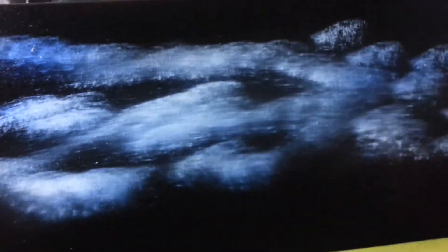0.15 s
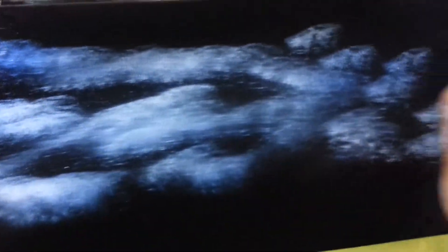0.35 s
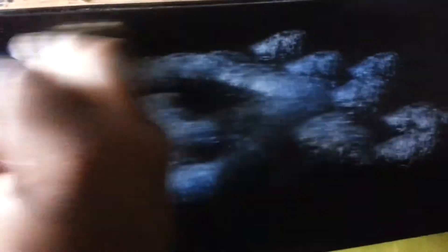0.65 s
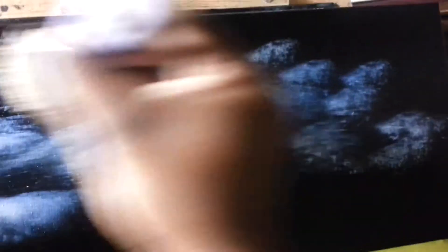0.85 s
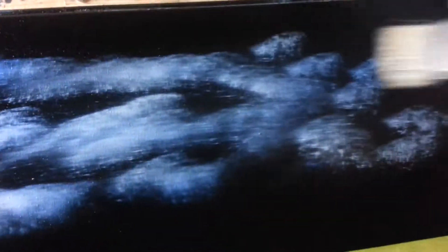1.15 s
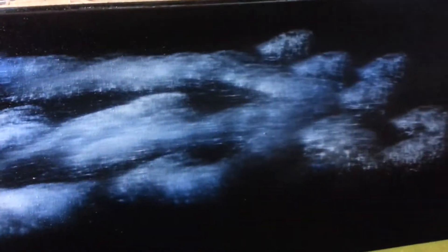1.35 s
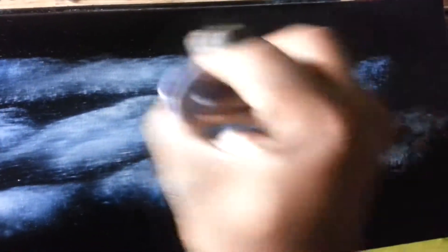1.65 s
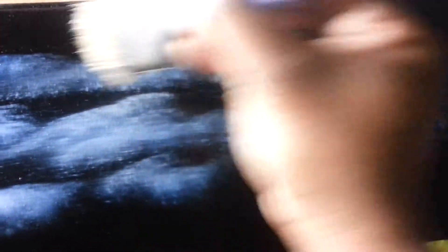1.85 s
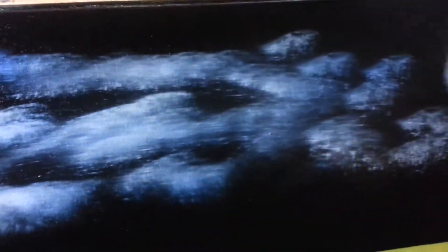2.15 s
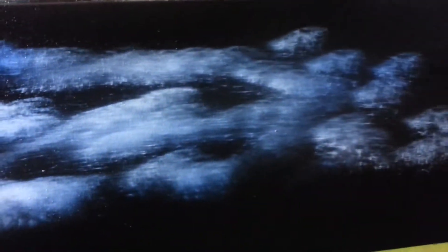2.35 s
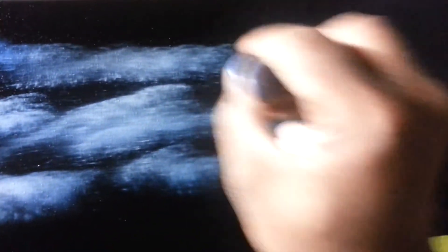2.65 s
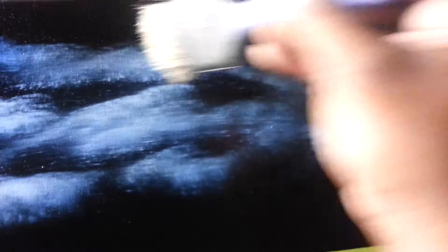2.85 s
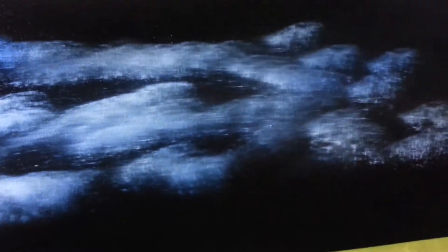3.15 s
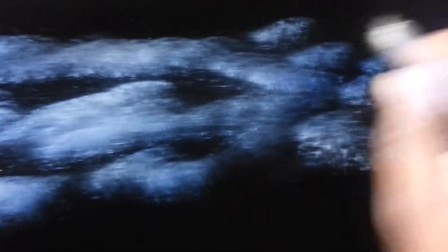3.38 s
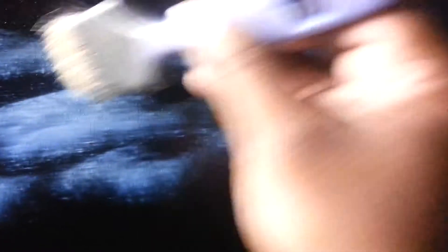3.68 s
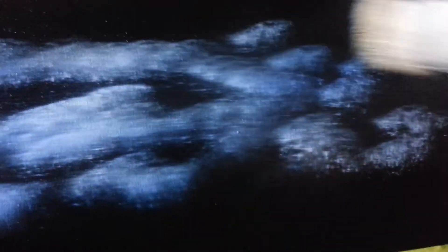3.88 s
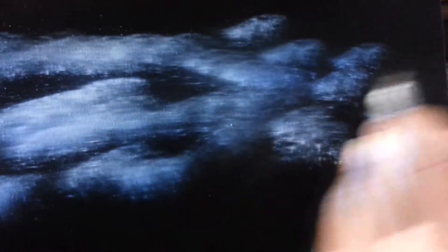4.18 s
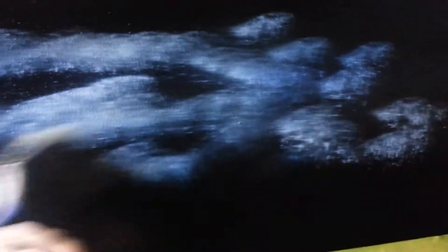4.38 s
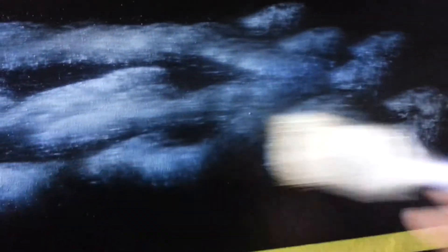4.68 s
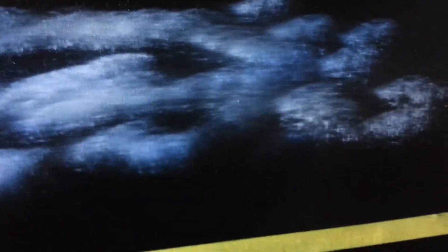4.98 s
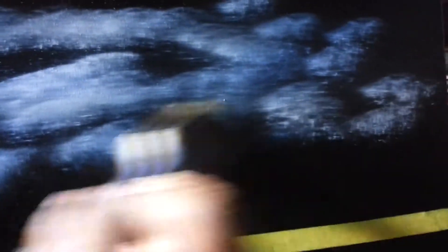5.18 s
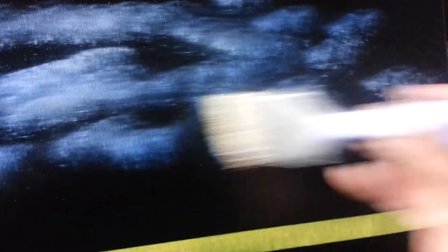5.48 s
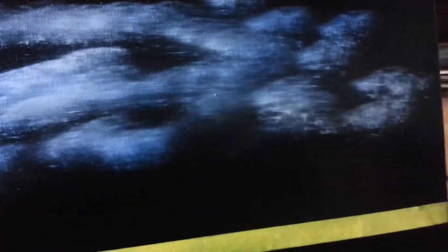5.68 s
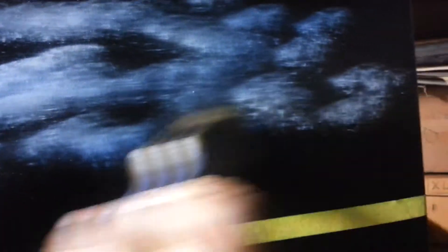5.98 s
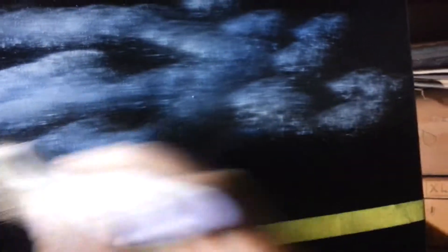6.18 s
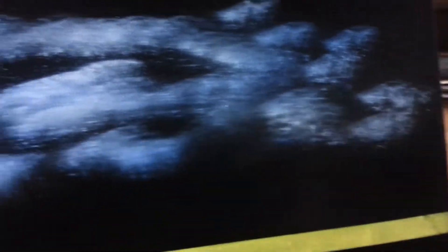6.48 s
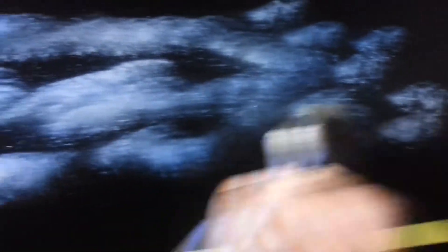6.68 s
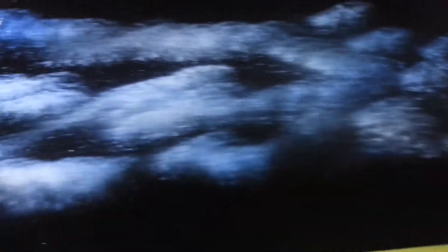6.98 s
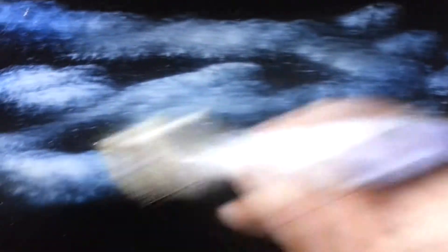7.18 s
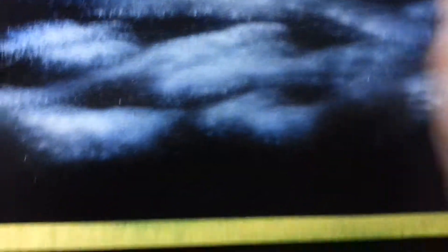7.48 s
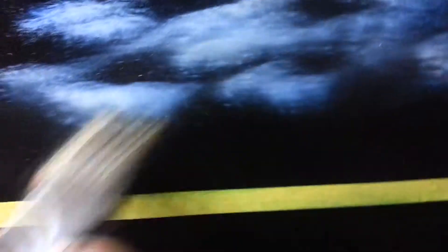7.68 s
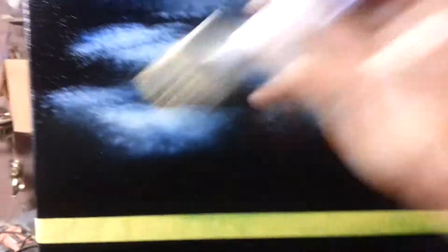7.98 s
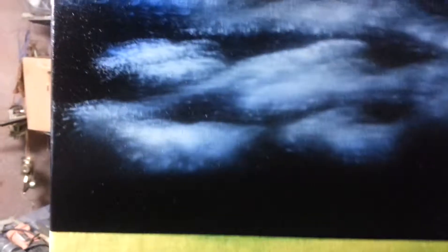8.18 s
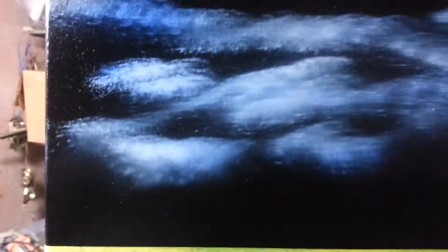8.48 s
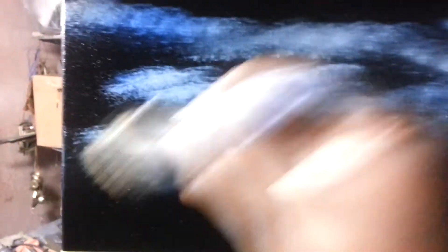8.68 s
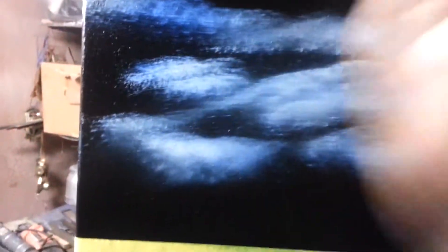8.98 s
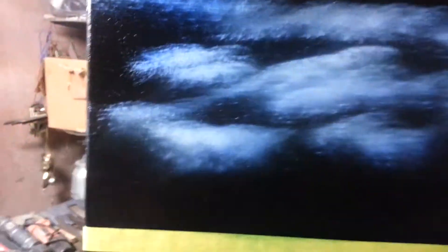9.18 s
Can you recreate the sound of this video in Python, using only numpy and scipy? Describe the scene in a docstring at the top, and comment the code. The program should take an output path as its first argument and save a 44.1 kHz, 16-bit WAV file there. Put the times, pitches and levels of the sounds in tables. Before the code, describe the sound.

A wide dry paintbrush sweeps back and forth across a stretched canvas, close to the microphone and a little to the right. Each short stroke is a scratchy, bristly hiss with a faint zip from the weave, about two a second with brief gaps. Now and then the bristles give a tiny squeak or a bump makes the canvas drum softly. A small room hums faintly in the pauses.

```python
"""A wide dry paintbrush sweeps back and forth over a stretched canvas, close by and to the right.
From the first stroke, thousands of bristles slip off the threads in a dry hiss, and the regular weave
adds a faint zip whose pitch follows the speed of the hand. Bristles squeak briefly as they flick free
at a lift or catch on the weave, and a small room hums in the pauses. From the second stroke on, an
occasional bump sets the canvas drumming softly in its membrane modes, while the strokes go on."""
import sys
import numpy as np
from scipy import signal
from scipy.fft import rfft, irfft, next_fast_len
from scipy.io import wavfile
from scipy.ndimage import uniform_filter1d

SR = 44100
rng = np.random.default_rng(int(sys.argv[2]) if len(sys.argv) > 2 else 0)


def wrap_up_sound(samples):
    """Save the sound to the file named by the first command line argument, as 16-bit audio."""
    columns = np.atleast_2d(samples).T
    # keep every value between -1 and 1, then stretch to whole-number steps
    tamed = np.clip(columns, -1, 1)
    steps = np.round(tamed * 32767).astype(np.int16)
    wavfile.write(sys.argv[1], SR, steps)


N = 411894
TIME = np.arange(N) / SR

# Brush strokes. Each row: touch, lift, attack and settling time in seconds; settled pressure level, its
# offset on landing, its change by the lift and the cloth's further change as the brush rolls, in dB;
# relative levels of rasp, tip hiss and zip in dB; moments of flattest bristles and fastest hand in
# seconds; thread-crossing rates at the touch, at the fastest moment and at the lift in Hz.
STROKES = [(-0.027, 0.238, 0.02, 0.04, -40.0, -2.0, 1.5, -6.0, -4.0, -3.0, -5.5, 0.12, 0.13, 1250, 1970, 2030),
           (0.453, 0.785, 0.065, 0.23, -39.0, -3.5, -7.0, 1.0, -3.5, -2.5, -9.0, 0.6, 0.78, 870, 1800, 1800),
           (1.044, 1.331, 0.017, 0.09, -40.0, -6.0, -2.0, -4.5, -2.0, -1.5, -3.0, 1.25, 1.28, 1210, 1570, 1770),
           (1.531, 1.845, 0.08, 0.19, -40.5, 3.0, 2.0, -2.5, -2.0, -2.0, -8.0, 1.7, 1.84, 590, 1820, 1820),
           (2.095, 2.307, 0.027, 0.09, -40.5, -4.0, -2.0, -4.0, -2.0, -1.0, -8.0, 2.22, 2.12, 1450, 1540, 1030),
           (2.659, 2.863, 0.024, 0.17, -40.0, -0.5, 1.0, -2.0, -1.5, -0.0, -15.0, 2.77, 2.83, 940, 1270, 1540),
           (3.043, 3.26, 0.022, 0.06, -41.0, 6.0, -1.0, -5.5, -0.0, 1.0, -8.5, 3.18, 3.25, 760, 1680, 1680),
           (3.374, 3.708, 0.049, 0.2, -39.5, 2.5, 3.5, -1.0, -2.0, -1.5, -9.0, 3.56, 3.68, 420, 1510, 1510),
           (3.9, 4.051, 0.037, 0.05, -39.5, -4.0, 3.0, -3.0, -1.0, -0.5, -3.0, 3.98, 4.03, 1490, 2000, 1820),
           (4.256, 4.558, 0.049, 0.18, -40.0, -2.0, -2.0, 2.0, -1.0, 2.5, -4.5, 4.4, 4.41, 960, 1930, 1530),
           (4.66, 4.926, 0.051, 0.1, -39.5, 1.0, 2.0, -4.5, -1.0, -0.5, -4.0, 4.81, 4.87, 890, 2080, 2020),
           (5.113, 5.395, 0.111, 0.21, -37.0, -5.0, -5.0, 1.5, 0.0, 3.0, -5.0, 5.28, 5.25, 1170, 1800, 1580),
           (5.542, 5.745, 0.034, 0.05, -38.5, 4.0, -0.5, -4.0, 0.0, 0.5, -5.5, 5.64, 5.69, 980, 2040, 1750),
           (5.956, 6.224, 0.092, 0.17, -39.5, 1.0, -0.0, 4.0, 0.5, 3.0, -4.0, 6.09, 6.12, 1470, 1830, 1310),
           (6.398, 6.545, 0.027, 0.08, -36.5, -0.0, 2.5, -2.0, -0.5, -1.5, -7.0, 6.46, 6.52, 1430, 2180, 1850),
           (6.678, 7.132, 0.044, 0.17, -40.0, 1.0, -1.0, 8.0, 0.0, 2.0, -4.5, 6.87, 6.9, 780, 2020, 700),
           (7.238, 7.402, 0.046, 0.1, -38.0, -1.0, 1.0, 0.0, -2.0, 1.0, -10.0, 7.38, 7.4, 780, 2300, 2300),
           (7.611, 7.89, 0.041, 0.15, -38.5, -2.0, 1.0, -4.5, -0.5, 2.0, -10.0, 7.76, 7.78, 760, 1990, 1710),
           (7.97, 8.223, 0.099, 0.2, -36.0, -5.5, -1.5, -6.5, -1.5, -0.0, -6.0, 8.17, 8.22, 740, 2180, 2180),
           (8.365, 8.605, 0.023, 0.08, -40.0, -12.0, 0.0, -1.5, -1.0, 0.5, -6.0, 8.45, 8.53, 1650, 2000, 1750),
           (8.783, 8.937, 0.034, 0.11, -37.5, -7.5, 1.5, -6.0, 0.0, 3.5, -4.5, 8.88, 8.93, 1030, 2210, 2210),
           (9.093, 9.274, 0.015, 0.08, -42.0, -15.5, 4.0, -3.0, -0.0, 1.0, -4.5, 9.19, 9.19, 1630, 1920, 1710)]
# Response of cloth, shafts and tips to the hand. Each row: exponent of speed in the amplitude, extra
# level on landing in dB, lead of the release before the lift in seconds, release time in seconds.
FRICTION_LAWS = [(1.7, 0.1, .0042, .015), (1.19, -3.2, .0002, .0125), (1.21, -5.8, .0002, .012)]
# Spectra of the rubbed cloth, the rasping shafts, the hissing tips and their topmost sparkle.
# Each row: frequency in Hz, relative level in dB.
CLOTH_SPECTRUM = [(40, -40), (120, -27), (300, -13.5), (550, -11.5), (800, -4), (1100, -4.5), (1500, 0.5),
                  (2200, 0), (2600, 0.5), (3200, -4.5), (5000, -26), (14000, -50)]
SHAFT_SPECTRUM = [(1500, -29), (2200, -16), (2700, -4), (3200, 0), (4000, 0), (4900, -1), (5800, -10),
                  (7500, -11), (14000, -26)]
TIP_SPECTRUM = [(3000, -32), (5000, -2), (6300, -1.5), (7500, -1), (8800, 2.5), (10500, 0.5), (12500, -1.5),
                (14500, -13.5)]
SPARKLE_SPECTRUM = [(7000, -30), (10500, -6), (13500, 6)]
# Resonances of the bent shafts. Each row: frequency in Hz, width in Hz, relative level in dB.
SHAFT_MODES = [(2587, 136, -5.5), (3904, 430, -4.5)]
# Spectrum of the room noise and the filter for its rumble. Each row: frequency in Hz, gain in dB.
ROOM_SPECTRUM = [(15, -42), (25, -21.5), (97, -9), (134, -3), (205, -4), (388, -7.5), (455, -12),
                 (534, -12), (862, -19), (1100, -20), (1430, -19), (1970, -23), (2710, -22.8), (5710, -28),
                 (14500, -26.5)]
RUMBLE_BAND = [(150, 4), (280, -6), (600, -40)]
# Likeness of the room noise at the two sides. Each row: frequency in Hz, correlation.
ROOM_COHERENCE = [(30, 0.37), (80, 0.25), (250, 0.41), (700, 0.15), (2000, 0.068), (8000, 0.024)]
# Two hums that trade places. Each row: time in seconds, relative levels of the lower and upper in dB.
HUM_LEVELS = [(.9, -64, -64), (1.4, -60.5, -59), (2.0, -65, -55), (2.5, -71, -54), (2.95, -56, -60.5),
              (4.2, -58.5, -64), (6.65, -58.5, -65), (7.5, -62, -65), (8.0, -66, -56), (9.3, -68, -58.5)]
# Brief bristle squeaks: catching on the weave during a stroke, or flicking free at the lift.
# Each row: time in seconds, pitch in Hz, relative level in dB.
SQUEAKS = [(.238, 3897, -38.5), (.775, 2080, -43), (1.277, 1610, -43), (2.225, 1380, -41.5),
           (2.74, 2500, -44), (2.852, 1501, -42), (2.855, 2584, -42.5), (4.04, 4041, -41),
           (4.408, 1950, -41), (4.93, 4000, -42), (6.535, 3806, -44), (7.39, 1291, -42), (8.218, 3898, -43),
           (8.442, 1800, -42), (8.93, 4300, -42), (9.27, 4100, -39)]
# Bumps on the canvas. Each row: time in seconds, relative level in dB, offset of the scuff in dB.
BUMPS = [(.621, -40.5, -17), (1.051, -43, -3), (1.162, -39, -13), (1.204, -33.5, -11), (1.218, -41, -12),
         (1.377, -41, -4), (4.095, -45, 6.5), (4.232, -61, 10), (5.666, -28.5, -16), (5.681, -30.5, -6),
         (5.692, -38, -3), (5.71, -32.5, -15), (5.893, -51, 4), (6.519, -44, -10), (7.024, -40, 3),
         (7.17, -38, 2), (7.185, -34, -9.5), (8.649, -45, -7)]
# Membrane modes. Each row: frequency in Hz, relative level in dB, time to fall by 60 dB in seconds.
CANVAS_MODES = [(133, -17.5, 0.24), (176, -17.5, 0.32), (237.6, -9.5, 0.31), (308, -5, 0.11),
                (348, -5.5, 0.098), (420, -2, .05), (520, 0, 0.034), (720, -12, 0.032), (1160, -17, .03)]
# Spectrum of the bristles' scuff at a bump. Each row: frequency in Hz, relative level in dB.
SCUFF_SPECTRUM = [(40, -25), (200, -7.5), (1100, -1.5), (3000, -4.5), (12000, -19)]
# Likeness of the brush at the microphone's two ports. Each row: frequency in Hz, correlation.
BRUSH_COHERENCE = [(200, 0.42), (500, 0.52), (1000, 0.72), (2000, 0.2), (4000, 0.077), (14000, .03)]
# Shadow on the left port, which faces away, and tone of the walls. Each row: frequency in Hz, gain in dB.
LEFT_SHADOW = [(200, 1), (500, -3.5), (1000, -6), (2000, -6.5), (4000, -9.5), (8000, -12.5), (14000, -13)]
WALL_RESPONSE = [(300, 12.5), (1500, 0), (4000, -4), (12000, -7)]


def from_db(db):
    """Amplitude grows tenfold for every 20 dB."""
    return 10 ** (np.asarray(db) / 20)


def unit_rms(x):
    """Division by the root mean square gives unit power."""
    return x / np.sqrt(np.mean(x ** 2) + 1e-20)


def ramp(elapsed_s, length_s):
    """A linear rise from 0 to 1 gives the share of a span gone by."""
    return np.clip(elapsed_s / np.maximum(length_s, 1e-3), 0, 1)


def colour(x, spectrum):
    """Filtering multiplies the spectrum by a gain curve, here in dB over log frequency."""
    size = next_fast_len(N, True)
    hz = np.maximum(np.fft.rfftfreq(size, 1 / SR), 1)
    knot_hz, knot_db = np.transpose(spectrum)
    gain = from_db(np.interp(np.log(hz), np.log(knot_hz), knot_db))
    return irfft(rfft(x, size) * gain, size)[..., :N]


def drift(rate_hz):
    """Low-passed noise wanders smoothly, with unit spread, at about the given rate."""
    step, warm_up = 20, 4000
    pole = np.exp(-2 * np.pi * step * rate_hz / SR)
    noise = rng.standard_normal(N // step + warm_up + 2)
    slow = signal.lfilter([1], [1, -2 * pole, pole * pole], noise)[warm_up:]
    return np.interp(np.arange(N) / step, np.arange(len(slow)), unit_rms(slow))


def narrow_noise(hz, width_hz):
    """Many near-equal vibrations beat about a moving pitch, differently at each port."""
    phase = 2 * np.pi * np.cumsum(hz) / SR
    cos, sin = np.cos(phase), np.sin(phase)
    return np.array([drift(width_hz) * cos + drift(width_hz) * sin for port in range(2)]) / np.sqrt(2)


def hand_strokes(zip_catch_s=.08, zip_landing_db=-9, zip_fade_db_per_s=55, zip_slow_db=2):
    """Friction noise grows with pressure and speed; the thread-crossing rate follows speed alone."""
    envelopes = np.zeros((3, N))   # cloth, shafts, tips
    weave_hz = np.full(N, np.mean(np.array(STROKES)[:, -3:]))
    zip_db = np.zeros(N)
    for (touch, lift, attack, settle, level_db, landing_db, ease_db, roll_db,
         rasp_db, tips_db, stroke_zip_db, flattest, fastest, touch_hz, top_hz, lift_hz) in STROKES:
        span = slice(*np.searchsorted(TIME, [touch, lift + .1]))   # still by 0.1 s after the lift
        t = TIME[span]
        # the hand speeds up to its fastest moment, then slows until the lift
        early = ramp(fastest - t, fastest - touch) ** 1.3
        late = ramp(t - fastest, lift - fastest) ** 2.05
        weave_hz[span] = top_hz + (touch_hz - top_hz) * early + (lift_hz - top_hz) * late
        speed = weave_hz[span] / top_hz
        # the pressure settles after landing, then eases off or digs in towards the end
        landing = (1 - ramp(t - touch, settle)) ** .51
        leaving = ramp(t - touch, lift - touch) ** 6.5
        pressure = ramp(t - touch, attack) * from_db(level_db + landing_db * landing + ease_db * leaving)
        for envelope, part_db, law in zip(envelopes, (roll_db * leaving, rasp_db, tips_db), FRICTION_LAWS):
            power, soft_db, lead_s, release_s = law
            release = np.exp(-np.maximum(t - lift + lead_s, 0) / release_s)
            envelope[span] += pressure * speed ** power * from_db(part_db + soft_db * landing) * release
        # the zip catches after the touch and is clearest with flat bristles and a slow hand
        catch_db = zip_landing_db * (1 - ramp(t - touch, zip_catch_s))
        fade_db = zip_fade_db_per_s * np.abs(t - flattest)
        zip_db[span] = stroke_zip_db + catch_db - fade_db + zip_slow_db * (1 - speed)
    return envelopes, weave_hz, zip_db


def bristle_slips(spectrum, per_s, spread_db):
    """Bristles slipping off threads at random make shot noise; each port hears its own clicks."""
    slips = rng.random((2, N)) < per_s / SR
    size, sign = rng.random((slips.sum(), 2)).T
    clicks = np.zeros((2, N))
    clicks[slips] = from_db(spread_db * np.minimum(-np.log(1 - size), 4)) * np.sign(sign - .5)
    return unit_rms(colour(clicks, spectrum))


def cloth_rub(speed):
    """Stick-slip friction drives the cloth, with more slips a second as the hand speeds up."""
    flutter = from_db(-.1 * drift(120))
    return flutter * bristle_slips(CLOTH_SPECTRUM, per_s=14000 * speed, spread_db=3)


def shaft_rasp(speed, bend_octaves=.17):
    """The shafts rasp and resonate, at pitches that slide as they bend and straighten."""
    flutter = from_db(-.1 * drift(120))
    rasp = flutter * bristle_slips(SHAFT_SPECTRUM, per_s=14000 * speed, spread_db=2.5)
    bend = 2 ** (bend_octaves * np.clip(drift(4), -2, 2))
    ringing = sum(from_db(db) * narrow_noise(hz * bend, width_hz) for hz, width_hz, db in SHAFT_MODES)
    return unit_rms(rasp + ringing)


def tip_hiss(speed, sparkle_db=-8):
    """The tips make high shot noise; faster tips snap harder and add to the very top."""
    hiss = bristle_slips(TIP_SPECTRUM, per_s=22000 * speed, spread_db=2)
    sparkle = unit_rms(colour(rng.standard_normal((2, N)), SPARKLE_SPECTRUM))
    return hiss + from_db(sparkle_db) * speed ** 1.5 * sparkle


def weave_zip(weave_hz, zip_db, boost_db=10.5, octave_db=-11, skid_db=-6, zip_width_hz=48,
              skid_width_hz=260):
    """Periodic forcing: bristles that keep pace sing the weave rate in fits; bent ones skid about it."""
    tone = narrow_noise(weave_hz, zip_width_hz) * from_db(2.3 * drift(38))
    tone += from_db(octave_db) * narrow_noise(2 * weave_hz, skid_width_hz)
    skid = from_db(skid_db) * narrow_noise(weave_hz, skid_width_hz)
    return from_db(boost_db + zip_db) * tone + skid


def brush(envelopes, weave_hz, zip_db, cloth_db=2.9, shaft_db=4.6, tip_db=4.5):
    """The friction sounds superpose, and flutter together as tufts catch and let go."""
    cloth_envelope, shaft_envelope, tip_envelope = envelopes
    speed = weave_hz / np.mean(weave_hz)
    flutter = from_db(drift(34))
    cloth = cloth_envelope * (from_db(cloth_db) * cloth_rub(speed) + weave_zip(weave_hz, zip_db))
    shafts = shaft_envelope * from_db(shaft_db) * shaft_rasp(speed)
    tips = tip_envelope * from_db(tip_db) * tip_hiss(speed)
    return flutter * (cloth + shafts + tips)


def room_noise(level_db=-57):
    """Dull noise is only partly coherent: a side signal of opposite signs sets left and right apart."""
    mid, side = rng.standard_normal((2, N))
    side_spectrum = [(hz, 10 * np.log10((1 - alike) / (1 + alike))) for hz, alike in ROOM_COHERENCE]
    air = colour(mid + colour(side, side_spectrum) * [[1], [-1]], ROOM_SPECTRUM)
    return air * from_db(level_db) / np.std(air.mean(axis=0))


def room_hums(pitches_hz=(80.5, 121.6), gain_db=-3, wander_hz=2.32, flutter_db=4):
    """Two low sinusoids, randomly modulated in level and pitch, take turns as the louder."""
    times, *curves_db = np.transpose(HUM_LEVELS)
    hums = np.zeros(N)
    for hz, curve_db in zip(pitches_hz, curves_db):
        level_db = np.interp(TIME, times, curve_db) + gain_db + flutter_db * np.tanh(drift(14.96))
        phase = 2 * np.pi * np.cumsum(hz + wander_hz * drift(8)) / SR
        hums += from_db(level_db) * np.sqrt(2) * np.sin(phase)
    return hums


def background(cloth_envelope, sink_at_db=-47, rumble_share=.43):
    """Amplitude modulation: the room's rumble and hums sink while the brush is sounding."""
    air = room_noise()
    rubbing = uniform_filter1d(cloth_envelope, size=1500)
    calm = 1 / (1 + (rubbing / from_db(sink_at_db)) ** 2)
    return air - rumble_share * (1 - calm) * colour(air, RUMBLE_BAND) + calm * room_hums()


def bristle_squeaks(gain_db=5, swell_s=.014, relative_width=.14):
    """Bristles catching on the weave or flicking free squeak: a swell of noise through one resonance."""
    out = np.zeros(N)
    for at_s, hz, level_db in SQUEAKS:
        span = slice(*np.searchsorted(TIME, [at_s - 3 * swell_s, at_s + 3 * swell_s]))
        t = TIME[span] - at_s
        pole = np.exp(-np.pi * relative_width * hz / SR)
        resonance = [1, -2 * pole * np.cos(2 * np.pi * hz / SR), pole * pole]
        band = unit_rms(signal.lfilter([1, 0, -1], resonance, rng.standard_normal(SR // 2)))
        out[span] += from_db(gain_db + level_db) * np.exp(-(t / swell_s) ** 2) * band[:len(t)]
    return out


def damped_mode(impulses, hz, t60):
    """A damped oscillator answers a unit impulse with a decaying sine of height 1."""
    pole, angle = from_db(-60 / (t60 * SR)), 2 * np.pi * hz / SR
    return signal.lfilter([0, np.sin(angle)], [1, -2 * pole * np.cos(angle), pole * pole], impulses + 1e-18)


def canvas_bumps(thud_db=-6, scuff_db=-1, scuff_s=.014):
    """Each impact excites the membrane's modes in a new mix, with a brief scuff of bristles."""
    times, bump_db, scuff_offset_db = np.transpose(BUMPS)
    onsets = np.round(times * SR).astype(int)
    scatter_db = rng.normal(0, 2.2, (len(onsets), len(CANVAS_MODES)))
    impulses, thuds = np.zeros((2, N))
    for k, (hz, mode_db, t60) in enumerate(CANVAS_MODES):
        impulses[onsets] = from_db(thud_db + bump_db + mode_db + scatter_db[:, k])
        thuds += (-1) ** k * damped_mode(impulses, hz, t60)
    impulses[onsets] = from_db(scuff_db + bump_db + scuff_offset_db)
    fade = signal.lfilter([1], [1, -np.exp(-1 / (scuff_s * SR))], impulses + 1e-18)
    return thuds + fade * unit_rms(colour(rng.standard_normal(N), SCUFF_SPECTRUM))


def microphone_ports(source, lag_s=.00015, room_t60=.16, room_db=-17):
    """Path difference and shadowing make the left port late and dull; both hear a short reverberation."""
    independent, right = source
    hz, alike = np.transpose(BRUSH_COHERENCE)
    left = colour(right, np.c_[hz, 20 * np.log10(alike)])
    left += colour(independent, np.c_[hz, 10 * np.log10(1 - alike ** 2)])
    left = colour(np.interp(TIME - lag_s, TIME, left), LEFT_SHADOW)
    t = TIME[:SR // 2]
    echoes = rng.standard_normal((2, len(t))) * from_db(-60 * t / room_t60) * (t > .004)
    echoes /= np.sqrt(np.sum(echoes ** 2, axis=1, keepdims=True))
    reverberation = signal.fftconvolve(colour(right, WALL_RESPONSE)[None], echoes, axes=1)[:, :N]
    return np.array([left, right]) + from_db(room_db) * reverberation


def scene():
    """Brush, squeaks, canvas and room add by superposition."""
    envelopes, weave_hz, zip_db = hand_strokes()
    bristles = brush(envelopes, weave_hz, zip_db)
    squeaks = np.array([bristle_squeaks() for port in range(2)])
    return microphone_ports(bristles + squeaks + canvas_bumps()) + background(envelopes[0])


def record(dry):
    """A steep elliptic low-pass filter removes the treble above 14580 Hz."""
    return signal.sosfilt(signal.ellip(12, .1, 80, 14580, fs=SR, output="sos"), dry)


dry = scene()
out = record(dry)
wrap_up_sound(out)
```